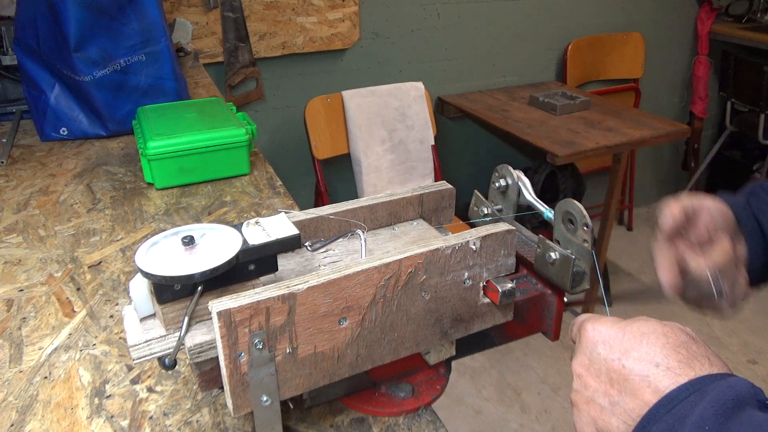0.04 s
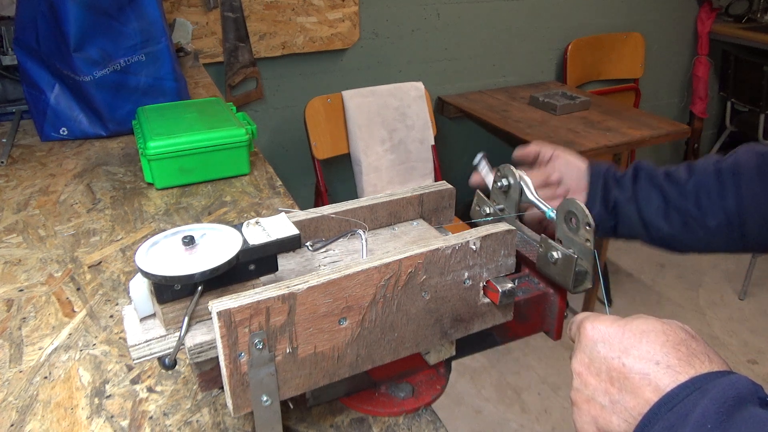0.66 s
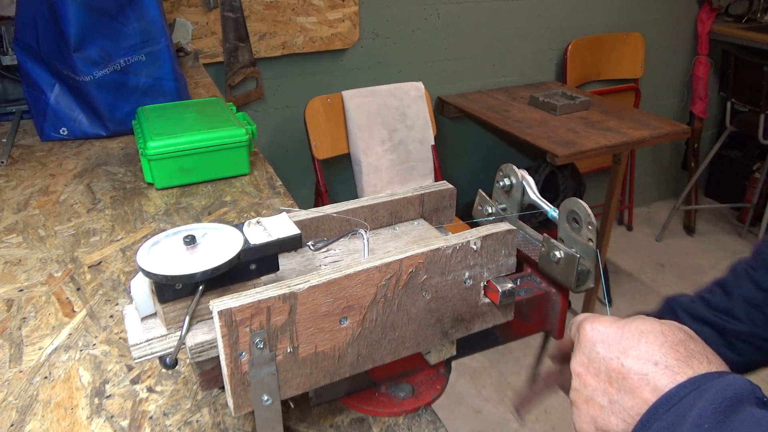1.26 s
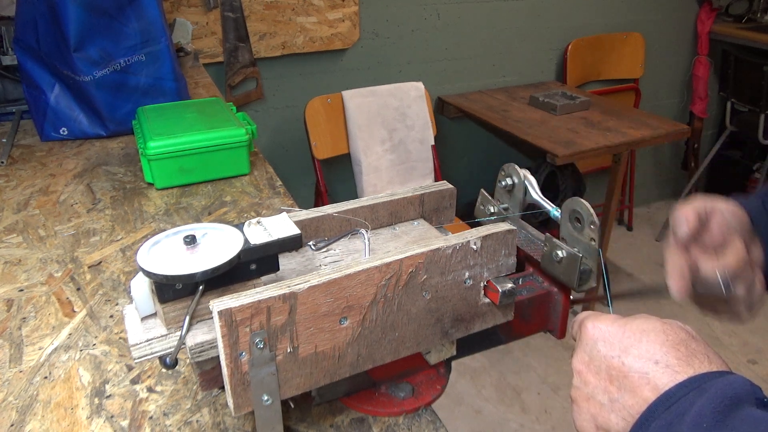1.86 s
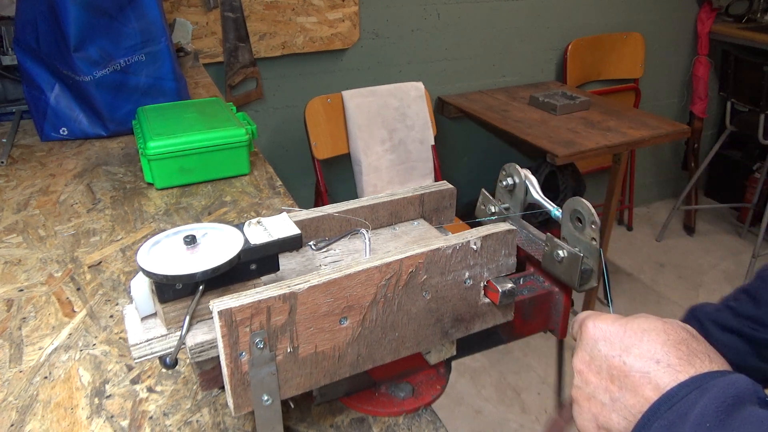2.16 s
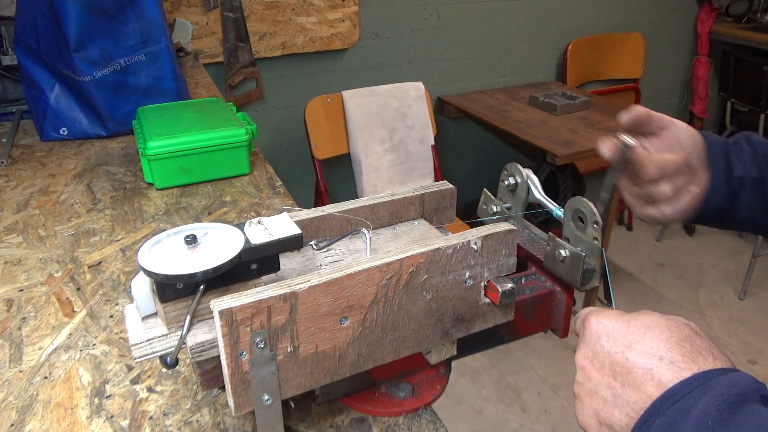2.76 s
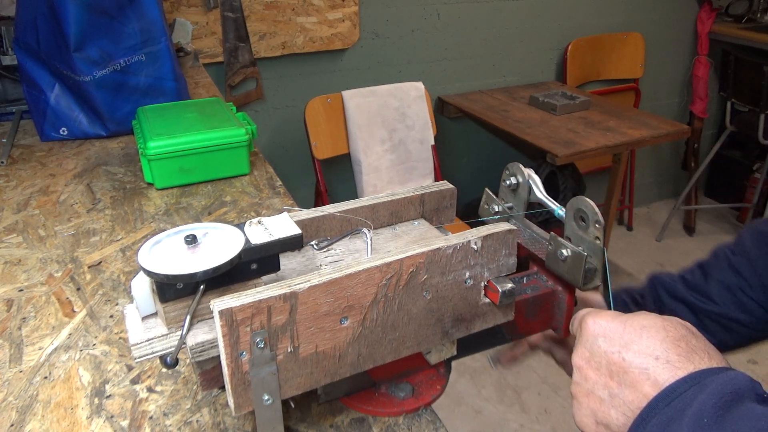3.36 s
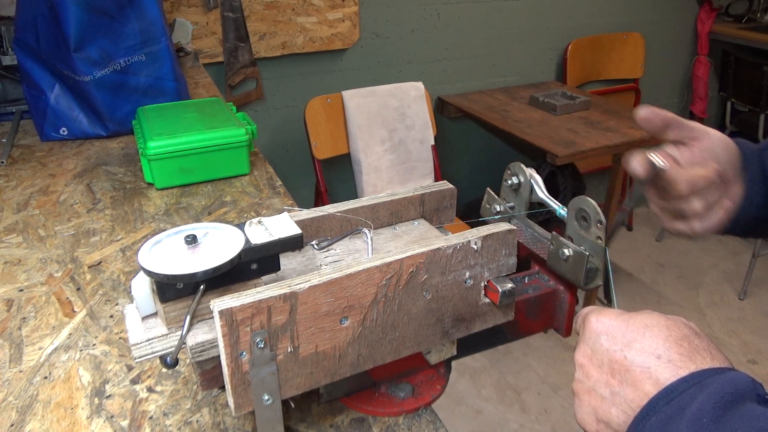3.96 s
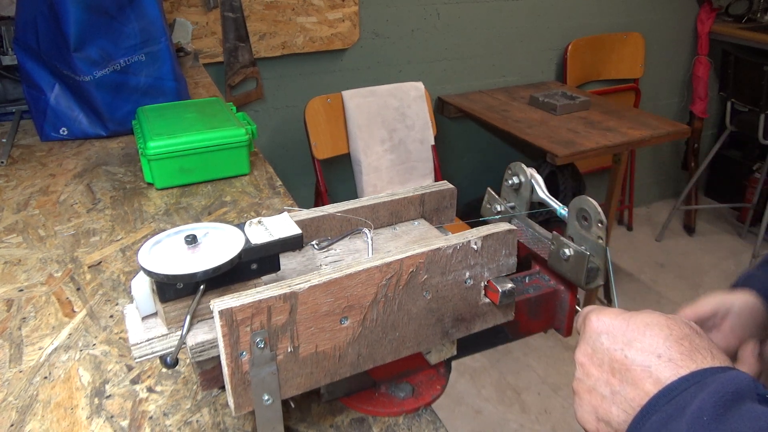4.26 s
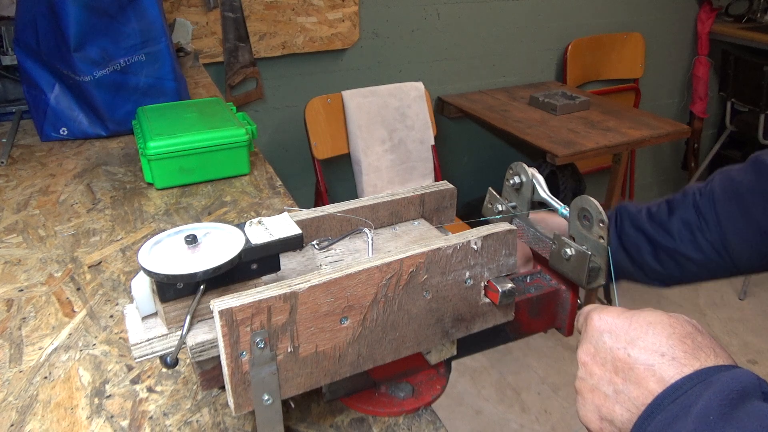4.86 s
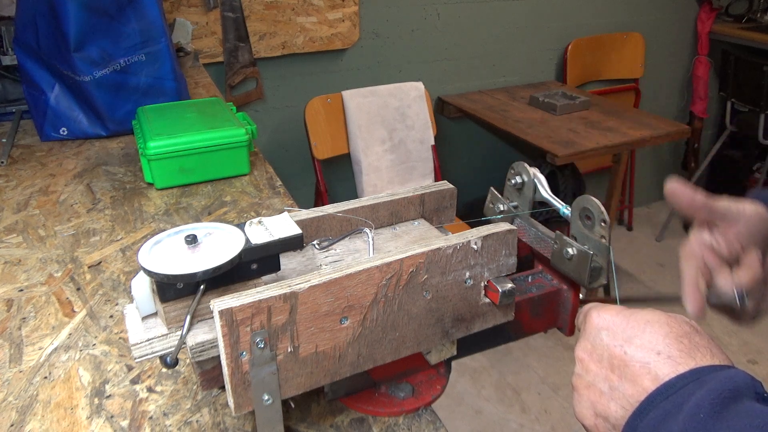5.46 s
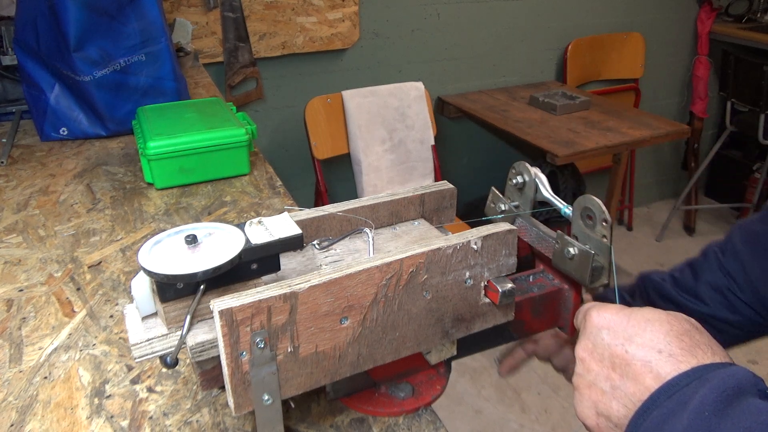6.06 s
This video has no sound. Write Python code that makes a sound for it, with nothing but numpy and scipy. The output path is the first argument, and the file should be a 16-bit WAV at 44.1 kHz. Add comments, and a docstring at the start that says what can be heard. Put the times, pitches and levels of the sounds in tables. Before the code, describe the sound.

Sharp, bright ratchet clicks come slowly and irregularly as a winch is cranked by hand, each one thumping through the wooden boards that hold it. A couple of ringing metal clinks near the start, a few handle clacks and faint low groans fall between them, over quiet, uneven rubbing. After a longer pause comes one last snap, then only small ticks and rubbing. The sound is close, in a small, fairly dry workshop.

```python
"""A hand crank tightens a wire on a wooden rig clamped to a bench in a small workshop.
The winch rubs from the start; a loose steel bar clinks. From 0.3 s the ratchet pawl snaps over eight
teeth, each a steel click, then a hollow thud as the blow spreads through the boards. Between snaps the
loose handle knocks, small parts tick and the loaded frame groans. After the last snap at 4.6 s come
a short groan and faint ticks; the rubbing swells once more and the rumble drops."""
import sys
import numpy as np
from scipy import signal
from scipy.fft import rfft, irfft
from scipy.io import wavfile
from scipy.ndimage import uniform_filter1d

SR = 44100
rng = np.random.default_rng(int(sys.argv[2]) if len(sys.argv) > 2 else 0)


def put_to_file(sound):
    """Save the sound as 16-bit audio at rate SR, in the file named by the first command-line argument."""
    columns = np.atleast_2d(sound).T  # one column per channel
    safe = np.clip(columns, -1, 1)
    whole_steps = np.round(safe * 32767)
    wavfile.write(sys.argv[1], SR, whole_steps.astype(np.int16))


N = 269892
BLOW_TIME_S = np.arange(SR // 2) / SR

# pawl drops: (time [s], click [dB], deep thud [dB], hollow thud [dB], brightness [dB/octave])
SNAPS = [(0.272, -11.5, -25.5, -33.5, 0), (0.7441, -6.5, -24, -27.5, 4.5), (1.311, -9.5, -27.5, -28.5, -1),
         (1.71, -12, -27.5, -27.5, -1), (2.167, -11, -25.5, -25.5, -0.5), (2.9155, -10.5, -25, -24, -0.5),
         (3.474, -13, -25.5, -25, 0), (4.6298, -11.5, -26, -23, -1.2)]


def pawl_clicks(ring_db=-14, crack_db=-8, shiver_db=-17, slip_db=-19, slip_s=0.0005, detune=0.0018):
    """The pawl slips off the tooth tip, then strikes the plate; a harder blow is shorter, so brighter."""
    # modes of pawl and toothed plate: (frequency [Hz], level [dB], t60 [s])
    steel_modes = [(1277, -15.5, 0.13), (1510, -29, 0.037), (1994, -5.5, 0.038), (2516, -10.5, 0.038),
                   (2754, -15.5, 0.042), (3880, -13, 0.032), (4430, -9, 0.022), (5430, -11, 0.02),
                   (5880, -6.5, 0.027), (6630, -11, 0.016), (6775, 6, 0.018), (7050, -10, 0.022),
                   (7850, -22, 0.013), (9150, 5, 0.0043), (11000, -15, 0.0076), (11000, -3, 0.011),
                   (11800, -10, .011), (12400, -22, .008), (12900, -12, .008)]
    # contact crack: (frequency [Hz], density [dB])
    crack_spectrum = [(300, -39), (900, -11), (2200, 0), (3300, -3.5), (5000, -17), (6200, 4), (8800, 2.5),
                      (10200, -7.5), (11200, 4.5), (13000, 0.5), (14200, -7), (16500, -26)]
    # shiver running on through the winch: (frequency [Hz], density [dB])
    shiver_spectrum = [(300, -22), (1200, 4.5), (2400, -4), (3400, -6.5), (4800, -6.5), (5900, 1.5),
                       (6800, -2), (8500, -8), (10200, -9.5), (11500, -1.5), (14000, -12), (16500, -27)]
    out = np.zeros(N)
    for time_s, db, _, _, brightness in SNAPS:
        force_db = db + 10  # relative to a usual blow
        db_per_octave = brightness + 0.33 * force_db
        modes = slack_boost(tilt(steel_modes, db_per_octave), time_s)
        ring = sum(mode(hz * (1 + detune * rng.standard_normal()), mode_db + ring_db, t60_s,
                        rise_s=0.00023, delay_s=rng.uniform(0, 0.000384))
                   for hz, mode_db, t60_s in modes)
        crack = amp(crack_db) * burst(tilt(crack_spectrum, db_per_octave), rise_s=0.00055, t60_s=0.0067)
        shiver = burst(slack_boost(shiver_spectrum, time_s), rise_s=0.00062, t60_s=0.056)
        shiver *= amp(shiver_db + 0.45 * force_db)
        slip = burst(crack_spectrum, rise_s=0.00053, t60_s=0.012)
        add(out, time_s, amp(db + slip_db) * slip)
        add(out, time_s + slip_s, amp(db) * (ring + crack + shiver))
    return out


def slack_boost(rows, time_s, centre_hz=5530, width_hz=480, slack_db=9.5, tighten_s=1.7):
    """One band of the winch rings more freely until the wire is tight."""
    lift_db = slack_db * np.exp(-(time_s / tighten_s) ** 2)
    return [(hz, db + lift_db * np.exp(-((hz - centre_hz) / width_hz) ** 2), *rest)
            for hz, db, *rest in rows]


def board_thuds(wave_db=4, wood_db=-8, travel_s=0.010115, split_hz=370):
    """Bending waves are slower at low pitch: the boards sound after the click, the deepest last."""
    # modes of rig and bench boards: (frequency [Hz], level [dB], t60 [s])
    board_modes = [(169.4, -10, 0.3), (194, -12.5, 0.32), (208, 6, 0.14), (240.6, -0.7, 0.15),
                   (289.2, -14.5, 0.61), (361.3, 10.5, 0.019), (404.3, -5, 0.14), (493, -4.5, 0.12),
                   (577, -3.5, 0.22), (684.4, 0, 0.083), (726, -10.5, 0.23), (970, -1.5, 0.059),
                   (1045, -10.5, 0.14)]
    # dense, short wood vibration: (frequency [Hz], density [dB])
    wood_spectrum = [(90, -31), (190, -9), (300, 7.5), (450, -2), (700, -1), (1000, -22), (1500, -2),
                     (3000, -51)]
    out = np.zeros(N)
    wave = amp(wave_db) * bending_wave(travel_s=0.01376, centre_hz=355.7, width_octaves=1.27)
    wood = amp(wood_db) * burst(wood_spectrum, rise_s=0.0033, t60_s=0.04)
    for time_s, _, deep_db, hollow_db, _ in SNAPS:
        for hz, db, t60_s in board_modes:
            blow_db = deep_db if hz < split_hz else hollow_db
            delay_s = travel_s * np.sqrt(split_hz / hz)
            add(out, time_s, mode(hz, db + blow_db, t60_s, rise_s=0.0022, delay_s=delay_s))
        add(out, time_s, amp(hollow_db) * wave)
        add(out, time_s + 0.00302, amp(hollow_db) * wood)
    return out


def bending_wave(travel_s, centre_hz, width_octaves):
    """A blow disperses into a falling chirp: travel time goes as 1 / sqrt(frequency)."""
    hz = np.fft.rfftfreq(len(BLOW_TIME_S), 1 / SR) + 1
    magnitude = np.exp(-(np.log2(hz / centre_hz) / width_octaves) ** 2)
    lag_cycles = 2 * travel_s * np.sqrt(centre_hz * hz)
    wave = irfft(magnitude * np.exp(-2j * np.pi * lag_cycles), len(BLOW_TIME_S))
    return -wave / abs(wave).max()


def handle_knocks(contact_db=-6, ring_db=-11, body_db=-10, sway_db=-4, sway_s=0.014):
    """Hard contact, steel ring, dull clack, then the bench sways; a hard knock bounces once."""
    # handle knocking in its play: (time [s], clack [dB], thump [dB])
    knocks = [(0.9571, -20, -25), (1.11, -38, -34.5), (2.405, -31, -61), (2.5634, -19.5, -30.5),
              (3.3793, -25, -62), (3.928, -34, -41), (4.587, -28, -58)]
    # handle clack: (frequency [Hz], density [dB])
    clack_spectrum = [(300, -4), (650, -1.5), (1000, 8), (1400, -4.5), (2000, -12.5), (2800, -11),
                      (4000, -23.5), (6500, -16.5), (15000, -41)]
    # steel handle modes: (frequency [Hz], level [dB], t60 [s])
    handle_modes = [(943, -1.5, .06), (1100, -5, 0.041), (1360, -2, 0.038), (2750, -8, 0.05)]
    # bench sway modes: (frequency [Hz], level [dB], t60 [s])
    bench_modes = [(61.4, -3.5, 0.42), (87, -3, 0.16), (123.7, -2, 0.36), (173, 4, 0.14), (276, -3.5, 0.2),
                   (352, 2, 0.06), (597, 2, 0.05)]
    hard_knock_db, rebound_s, rebound_db = -24, 0.012, -4.5
    out = np.zeros(N)
    for start_s, clack_db, thump_db in knocks:
        hits = [(start_s, 0)]
        if clack_db > hard_knock_db:
            hits.append((start_s + rebound_s, rebound_db))
        for time_s, db in hits:
            contact = amp(contact_db) * burst(clack_spectrum, rise_s=0.00035, t60_s=0.0085)
            ring = sum(mode(*row, rise_s=0.00029, delay_s=rng.uniform(0, 0.001)) for row in handle_modes)
            body = amp(body_db) * burst(clack_spectrum, rise_s=0.0003, t60_s=0.062)
            sway = sum(mode(*row, rise_s=0.0019, delay_s=rng.uniform(0, 0.0056)) for row in bench_modes)
            add(out, time_s, amp(db + clack_db) * (contact + amp(ring_db) * ring + body))
            add(out, time_s + sway_s, amp(db + thump_db + sway_db) * sway)
    return out


def steel_ticks(tick_db=-10, ring_cycles=240, strays_per_s=2, stray_db=-41):
    """Light steel contacts leave small parts ringing, high ones briefest; fainter ticks fall at random."""
    # steel-on-steel touches: (time [s], tick [dB], ring frequency [Hz], ring [dB])
    touches = [(0.183, -18.5, 8150, -26), (0.584, -37.5, 11500, -38), (0.802, -26, 8150, -32),
               (1.6632, -31, 8500, -34), (3.4004, -33, 9400, -50), (3.8753, -36, 6000, -50),
               (4.098, -36, 2980, -47), (4.752, -34, 6400, -40), (4.76, -27.5, 6370, -41),
               (4.9282, -33, 4425, -32), (5.1526, -38, 9300, -47), (5.3557, -36.5, 12500, -50),
               (5.7075, -38, 10300, -48)]
    # tick before tilt: (frequency [Hz], density [dB])
    tick_spectrum = [(900, -23), (2800, -6.5), (4500, -9.5), (6500, 5), (8200, 2.5), (10000, 5.5),
                     (12500, 5), (16000, -15)]
    out = np.zeros(N)
    spectrum = tilt(tick_spectrum, db_per_octave=-7.5)
    stray_count = round(strays_per_s * N / SR)
    strays = [(rng.uniform(0, N / SR), rng.normal(stray_db, 1)) for _ in range(stray_count)]
    for time_s, db, *_ in touches + strays:
        add(out, time_s, amp(db + tick_db) * burst(spectrum, rise_s=0.00049, t60_s=0.037))
    for time_s, _, hz, db in touches:
        add(out, time_s, mode(hz, db, t60_s=ring_cycles / hz, rise_s=0.002))
    return out


def bar_clinks():
    """A loose steel bar is struck as it slides home; the hand can damp its ring."""
    # free bar modes: (frequency [Hz], level [dB], t60 [s])
    bar_modes = [(932, 0.5, 0.57), (1304, -0.5, 0.4), (1504, -13, 0.13)]
    # bar strikes: (time [s], level [dB], share of free ring time [ratio])
    clinks = [(0.185, -30, 1), (0.808, -30, 0.16)]
    out = np.zeros(N)
    for time_s, db, ring_share in clinks:
        for hz, mode_db, t60_s in bar_modes:
            add(out, time_s, mode(hz, db + mode_db, t60_s * ring_share, rise_s=0.00099))
    return out


def frame_groans(pitch_waver=0.061):
    """Short stick-slip shudders of the loaded frame."""
    # shudders: (time [s], length [s], pitch [Hz], level [dB])
    groans = [(0.63, 0.12, 197, -37.5), (1.53, 0.15, 182, -37.5), (2.47, 0.2, 179.7, -37),
              (3.6, 0.22, 171, -42.5), (4.92, 0.071, 113, -42)]
    out = np.zeros(N)
    for time_s, length_s, hz, db in groans:
        size = int(length_s * SR)
        pitch_hz = hz * (1 + pitch_waver * wander(size, smooth_samples=500))
        tone = np.sin(2 * np.pi * np.cumsum(pitch_hz) / SR)
        add(out, time_s, amp(db) * signal.windows.tukey(size, 0.7) * tone)
    return out


def winch_rubbing(rub_trim_db=-0.35, lump_db=2, grain_db=1.28, low_hz=350, high_hz=3500, top_hz=15900):
    """The turning winch rumbles and rubs unevenly; a soft hiss partly follows the rubbing."""
    # rubbing envelope: (time [s], level [dB])
    rub_envelope = [(0, -42.5), (0.31, -39.5), (0.59, -43.5), (0.87, -40.5), (1.48, -42.5), (1.8, -41),
                    (2.37, -44), (2.9, -43.5), (3.4, -44), (3.7, -43), (4.6, -46), (4.86, -49), (5.18, -44),
                    (5.5, -47.5), (6.12, -46.5)]
    # narrow winch resonances: (frequency [Hz], width [Hz], level [dB])
    resonances = [(1056, 44, -14), (1516, 17, -19), (1764, 22, -23.5), (2180, 115, -18), (2600, 33, -24)]
    # rumble and rub: (frequency [Hz], density [dB])
    rub_spectrum = [(15, -44), (25, -20), (54, -6), (175, -1), (253, -14), (287, -9), (360, -14.5),
                    (408, -10), (491, -13.5), (591, -8), (656, -14), (1010, -4.5), (1220, -16), (2220, -22),
                    (3500, -33.5), (4550, -63), (7700, -120)]
    # hiss: (frequency [Hz], density [dB])
    hiss_spectrum = [(3000, -1), (4500, -4), (5300, 0.5), (6000, 4), (6700, 2.5), (7600, -2.5),
                     (10000, -4.5), (12000, -3.5), (14000, -9), (16000, -12.5)]
    time_s = np.arange(N) / SR
    rub_db = np.interp(time_s, *np.transpose(rub_envelope))
    rumble_db = np.interp(time_s, [5.12, 5.72], [-44.5, -48])
    hiss_db = -56 + 0.35 * (rub_db + 44.5)
    lumps = wander(N, smooth_samples=3000)
    grain = wander(N, smooth_samples=2000)
    friction = rng.standard_normal(N)
    ringing = sum(amp(db) * unit_rms(signal.lfilter(*signal.iirpeak(hz, hz / width_hz, SR), friction))
                  for hz, width_hz, db in resonances)
    rumble = amp(rumble_db + lump_db * lumps) * noise(rub_spectrum, N, hi_hz=low_hz)
    rub = noise(rub_spectrum, N, low_hz, high_hz) + ringing
    hiss = amp(hiss_db) * noise(hiss_spectrum, N, high_hz, top_hz)
    return rumble + amp(rub_db + rub_trim_db + grain_db * grain) * rub + hiss


def room(sound, first_s=0.0067, damp_hz=8000, tap_density=0.1):
    """Sparse reflections off soft clutter; each band decays at its own rate."""
    # workshop decay: (frequency [Hz], t60 [s])
    decay_times = [(150, 0.36), (600, 0.22), (2000, 0.13), (6000, 0.2), (9000, 0.17), (13000, 0.16)]
    size = len(BLOW_TIME_S)
    taps = rng.standard_normal(size) * (rng.random(size) < tap_density) * (BLOW_TIME_S > first_s)
    hz, time_s, bands = signal.stft(taps, SR, nperseg=256)
    fade = amp(-60 * time_s / log_interp(decay_times, hz)[:, None])
    damping = np.hypot(1, hz / damp_hz)[:, None]
    tail = signal.istft(bands * fade / damping, SR, nperseg=256)[1]
    return signal.fftconvolve(sound, tail / np.linalg.norm(tail))[:N]


def mode(hz, db, t60_s, rise_s, delay_s=0):
    """One decaying partial with a soft onset."""
    age_s = np.maximum(BLOW_TIME_S - delay_s, 0)
    envelope = amp(db - 60 * age_s / t60_s) * (1 - np.exp(-age_s / rise_s))
    return envelope * np.sin(2 * np.pi * hz * age_s)


def burst(spectrum, rise_s, t60_s):
    """Dense modes that swell and decay together."""
    envelope = (1 - np.exp(-BLOW_TIME_S / rise_s)) * amp(-60 * BLOW_TIME_S / t60_s)
    return noise(spectrum, len(envelope)) * envelope / envelope.max()


def noise(spectrum, size, lo_hz=0, hi_hz=SR):
    """Band-limited coloured noise, rms 1."""
    hz = np.fft.rfftfreq(size, 1 / SR)
    magnitude = amp(log_interp(spectrum, hz)) * (hz >= lo_hz) * (hz < hi_hz)
    return unit_rms(irfft(magnitude * np.exp(2j * np.pi * rng.random(len(hz))), size))


def wander(size, smooth_samples):
    """Slow random drift, rms 1."""
    return unit_rms(uniform_filter1d(rng.standard_normal(size), size=smooth_samples))


def tilt(rows, db_per_octave, pivot_hz=6500):
    """Brightens or dulls a spectrum or mode set."""
    return [(hz, db + db_per_octave * np.log2(hz / pivot_hz), *rest) for hz, db, *rest in rows]


def log_interp(points, hz):
    """Table lookup on a log-frequency axis."""
    points_hz, values = np.transpose(points)
    return np.interp(np.log(hz + 1), np.log(points_hz + 1), values)


def amp(db):
    """Decibels to gain."""
    return 10 ** (np.asarray(db) / 20)


def unit_rms(sound):
    """Scales to rms 1."""
    return sound / np.sqrt(np.mean(sound ** 2) + 1e-20)


def add(mix, time_s, sound):
    """Mixes a sound in at time_s."""
    part = mix[max(round(time_s * SR), 0):][:len(sound)]
    part += sound[:len(part)]


def scene(pawl_room_db=-12, ticks_room_db=-20, wood_room_db=-17, side_room_db=-21, side_rub_db=-22):
    """All sources sit at the centre; reflections and rubbing spread a little."""
    clicks = pawl_clicks()
    ticks = steel_ticks() + bar_clinks()
    wood = board_thuds() + handle_knocks() + frame_groans()
    direct = clicks + ticks + wood
    steel_room = room(amp(pawl_room_db) * clicks + amp(ticks_room_db) * ticks)
    mid = direct + steel_room + amp(wood_room_db) * room(wood) + winch_rubbing()
    side = amp(side_room_db) * room(direct, first_s=0) + amp(side_rub_db) * winch_rubbing()
    return np.array([mid + side, mid - side])


def record(dry, cutoff_hz=16600):
    """Two close microphones, the left fuller in the bass; then a low-pass."""
    # microphone balance: (frequency [Hz], left minus right [dB])
    balance = [(30, 9), (80, 6.5), (160, 4.5), (215, 4), (320, -3.5), (520, 2.5), (1200, -0.15),
               (6500, 0.64), (13000, 2)]
    balance_db = log_interp(balance, np.fft.rfftfreq(N, 1 / SR))
    channels = irfft(rfft(dry) * amp(np.array([balance_db, -balance_db]) / 2), N)
    lowpass = signal.firwin(255, cutoff_hz, window=("kaiser", 9), fs=SR)
    return signal.oaconvolve(channels, lowpass[None], "same")


dry = scene()
out = record(dry)
put_to_file(out)
```